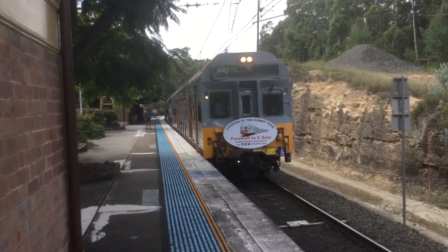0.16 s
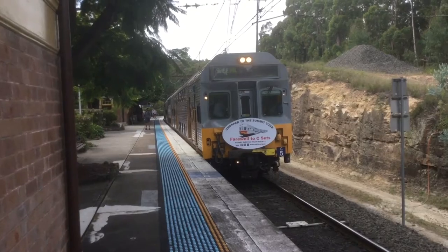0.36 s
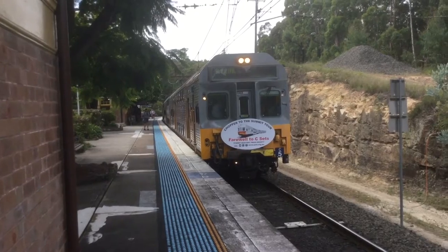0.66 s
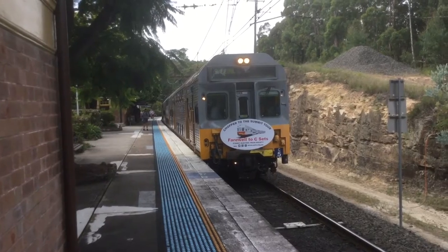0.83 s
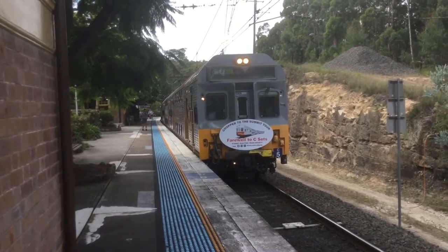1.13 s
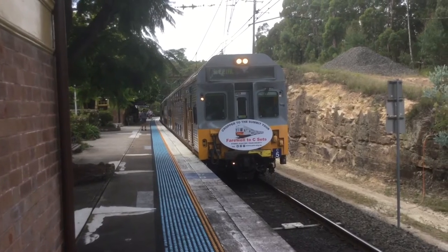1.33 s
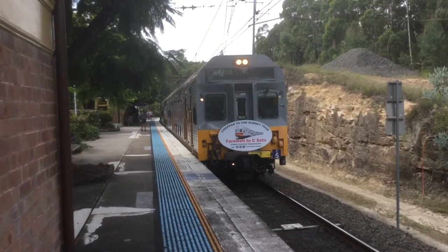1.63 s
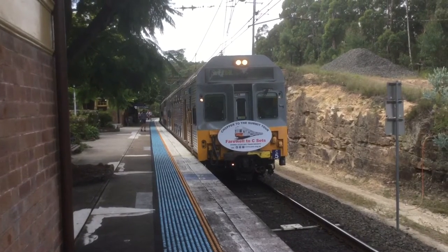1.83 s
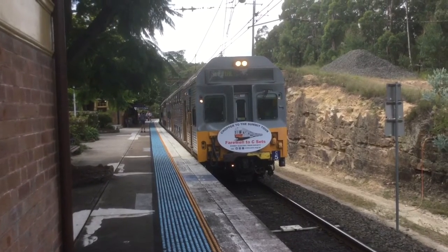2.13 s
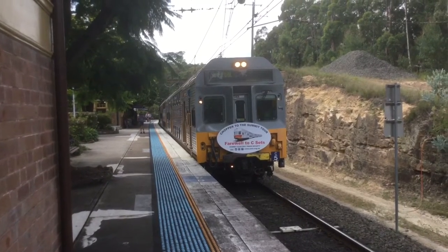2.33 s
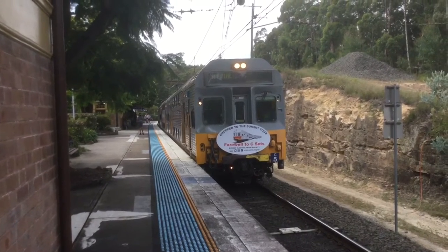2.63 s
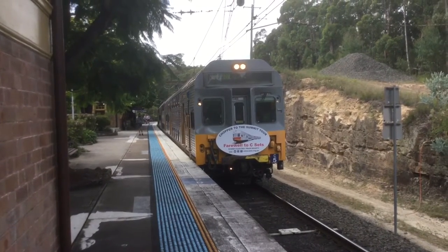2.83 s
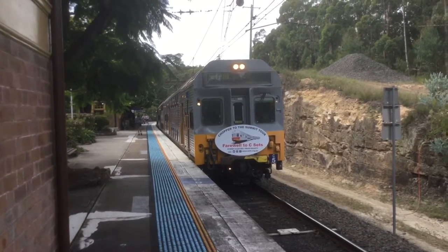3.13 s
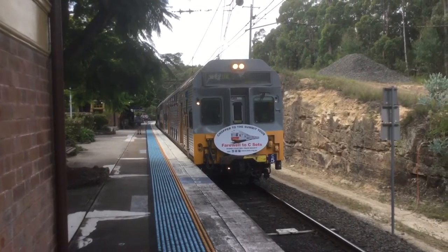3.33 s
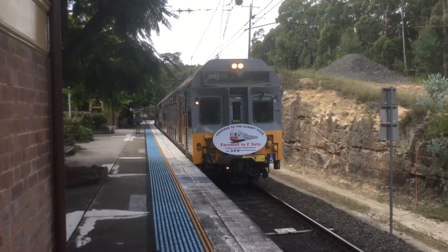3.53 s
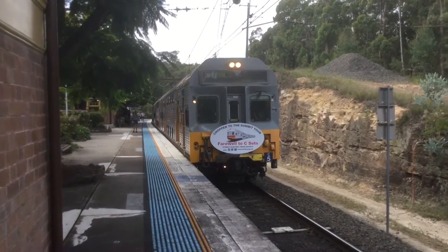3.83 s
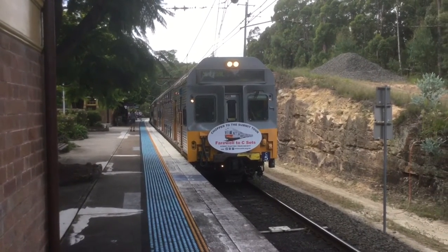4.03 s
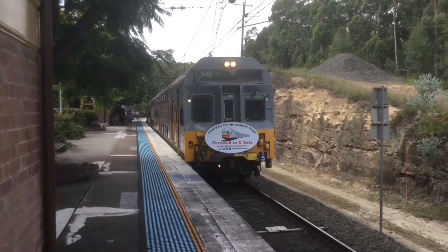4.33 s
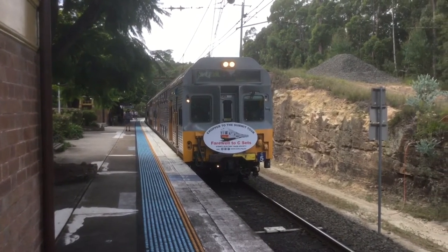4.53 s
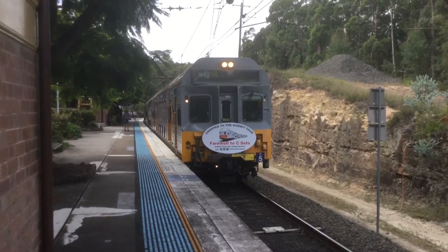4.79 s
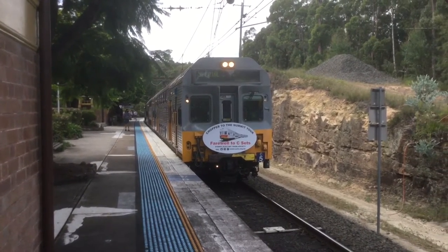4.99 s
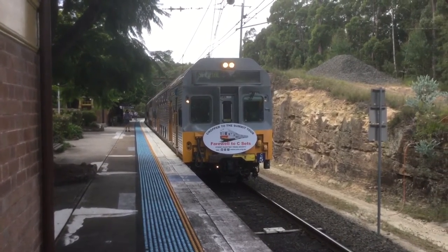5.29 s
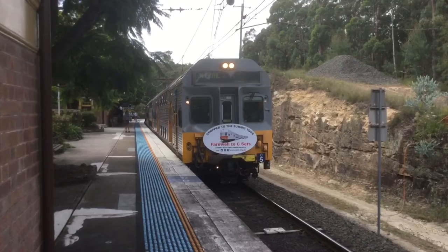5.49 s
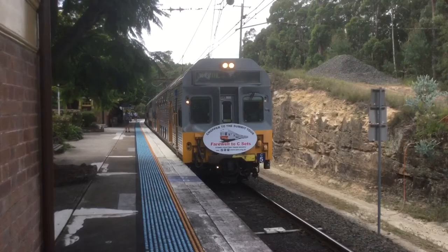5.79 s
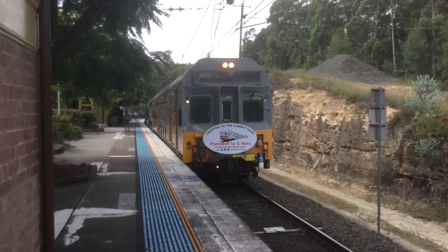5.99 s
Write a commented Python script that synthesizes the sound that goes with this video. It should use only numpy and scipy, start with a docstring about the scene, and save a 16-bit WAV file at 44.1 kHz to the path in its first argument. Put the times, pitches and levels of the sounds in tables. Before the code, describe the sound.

A standing electric train hums and rumbles while a valve releases a long, fading hiss of air and a small bird whistles faintly.

```python
"""An electric train stands at a platform in a rock cutting, its motor-alternator humming over
the rumble of its blowers. A valve opens and air hisses out, fading as the pressure falls.
Dull knocks, light clacks, low thumps, a chink and a few faint squeaks dot the bed.
Behind it a small bird gives six rising whistles, which echo off the rock."""
import sys
import numpy as np
from scipy import signal
from scipy.fft import rfft, irfft, next_fast_len
from scipy.io import wavfile

SR = 44100
rng = np.random.default_rng(int(sys.argv[2]) if len(sys.argv) > 2 else 0)


def dump_mix(stems):
    """Bounce the given channels to the path in sys.argv[1] as a 16-bit WAV at rate SR."""
    frames = np.atleast_2d(stems).T  # one column per channel
    limited = np.clip(frames, -1, 1)  # hard clip at full scale
    pcm = np.round(limited * 32767).astype(np.int16)
    wavfile.write(sys.argv[1], SR, pcm)


N = 271215
TIME = np.arange(N) / SR

# slaps off rock face, wall and train: delay_s, gain_db
SLAP_ECHOES = [(0.017, -15), (0.053, -16), (.078, -17)]
# bird whistles: top_pulse_s, pulse_spacing_s, start_hz, top_hz, level_db, growth_db_per_pulse
BIRD_WHISTLES = [(2.516, 0.044, 3110, 3840, -58.5, 0), (2.75, 0.044, 3240, 3974, -55.5, 2),
                 (3.008, 0.026, 3320, 4170, -54.5, 2.5), (3.251, 0.028, 3420, 4190, -52.5, 4),
                 (3.502, 0.030, 3430, 4280, -50.5, 4), (3.775, 0.025, 3380, 4190, -54.5, 3)]
# brief faint tones: peak_s, level_db, width_s, pitch_hz
FAINT_SQUEAKS = [(2.01, -73, .02, 3480), (2.277, -68, 0.034, 3540), (3.198, -59, .018, 7470),
                 (3.86, -61, 0.0056, 3030), (5.075, -49, 0.06, 492)]
# low thumps: peak_s, level_db, pitch_hz
LOW_THUMPS = [(0.281, -30, 103), (0.584, -31, 95), (0.761, -33, 66), (0.881, -30.5, 87), (2.249, -30.5, 92),
              (3.113, -28.5, 96.5), (3.706, -27.5, 98), (3.888, -30, 91), (4.349, -23.5, 78),
              (4.436, -30, 75.4), (4.69, -31, 105), (5.042, -28.5, 90)]
# dull knocks in the car body: start_s, level_db, decay_s
BODY_KNOCKS = [(0.276, -31.5, 0.014), (1.325, -38.5, 0.041), (3.358, -28.5, 0.044), (3.417, -30.5, 0.014),
               (6.027, -34.5, 0.03)]
# tone colour of the car body: frequency_hz, gain_db
BODY_SPECTRUM = [(50, -18), (100, 7.5), (150, 6), (250, 5.5), (320, -12.5), (700, -22), (1500, -83),
                 (6000, -90)]
# light clacks of loose metal gear: start_s, level_db, decay_s
GEAR_CLACKS = [(0.253, -52.5, .012), (0.266, -51.5, 0.012), (3.335, -47.5, 0.017), (3.355, -50.5, 0.025),
               (5.349, -52.5, 0.012), (5.543, -46, 0.0059), (5.899, -53, .006), (6.013, -53, .016)]
# tone colour of that gear: frequency_hz, gain_db
GEAR_SPECTRUM = [(300, 4), (650, -3), (1000, 5.5), (1400, 6.5), (2300, 1.5), (3000, -6), (4000, -13),
                 (7000, -34), (14000, -58)]
# ring of small metal parts: pitch_hz, level_db
CHINK_MODES = [(5790, -59.5), (6720, -56), (8600, -65), (9150, -60.5), (9950, -59.5), (11040, -66),
               (12200, -63)]
# spurts and ticks of the air system: peak_s, level_db, width_s, centre_hz, width_octaves
AIR_SPITS = [(0.985, -58, 0.016, 5900, 0.05), (1.2425, -45, .0007, 14500, 0.23),
             (1.78, -65.5, 0.19, 6600, 0.25), (3.346, -60.5, 0.016, 6540, 0.42),
             (4.92, -74, 0.17, 6000, .1), (5.1, -77.5, 0.57, 11700, .13), (5.997, -76, .004, 11000, .19),
             (6.044, -69, .010, 7800, .19)]
# surges in the fading jet: peak_s, gain_db, width_s
JET_SURGES = [(3.14, 2, 0.19), (4.72, 1, 0.05), (5.08, 0.5, 0.17)]
# tone colour of the valve's jet: frequency_hz, gain_db
JET_SPECTRUM = [(2500, -16), (4300, -12.5), (4480, -11), (4900, -6.5), (5200, -4), (5900, -3), (6500, -0.5),
                (7200, 0.5), (7550, -3.5), (8400, -4.5), (8900, -7), (9900, -9.5), (10700, -6.5),
                (11500, -6.5), (12800, -11), (13600, -35), (16000, -24)]
# ring of the valve's outlet pipe, relative to the jet: pitch_hz, gain_db, width_hz
PIPE_MODES = [(6040, -14, 53), (6390, -15.5, 55), (6760, -17, 45), (7020, -12.5, 60), (8120, -26, 76),
              (9240, -19.5, 45), (10500, -19.5, 55), (10970, -23, 45), (11200, -21, 60)]
# low rumble of the running machinery: frequency_hz, gain_db
RUMBLE_SPECTRUM = [(20, -57), (31, -42), (40, -18), (50, -3), (75, -3), (98, 1), (125, -4), (180, -3.5),
                   (255, -6), (305, -8), (365, -19.5), (430, -28), (600, -35), (1200, -79)]
# air roaring through the ducts: frequency_hz, gain_db
DUCT_SPECTRUM = [(250, -7), (420, -6), (480, 1), (570, -3.5), (740, -2.5), (860, -21), (1100, -14.5),
                 (2500, -72)]
# rush at the blower outlets: frequency_hz, gain_db
OUTLET_SPECTRUM = [(400, 2), (900, -1.5), (1150, -2.5), (1400, 1), (1850, -1), (2200, -1), (2700, -7),
                   (3250, -14), (4000, -18), (4600, -19), (6300, -19), (8200, -25), (11300, -26),
                   (13500, -37), (16000, -60)]
# fan and equipment tones: pitch_hz, level_db, width_hz
FAN_WHINES = [(95.2, -52, 13), (144.2, -58, 0.65), (342.7, -62, 6.1), (519, -68.5, 7), (1384, -69, 40),
              (2112, -68.5, 57), (2530, -76, 23)]
# hum of the motor-alternator: shaft_multiple, level_db
HUM_HARMONICS = [(3, -64), (4, -54.5), (6, -67), (8, -54.5), (9, -57), (10, -49.5), (12, -71.5), (14, -58),
                 (15, -67), (16, -66), (20, -78), (25, -62.5), (26, -73), (27, -72), (28, -69), (29, -68),
                 (36, -79.5)]


def from_db(db):
    """Decibels to gain."""
    return 10 ** (np.asarray(db) / 20)


def rms_one(x):
    """Scale to unit rms."""
    return x / np.sqrt(np.mean(x ** 2) + 1e-20)


def noise(gain_at):
    """Unit noise whose spectrum follows a function of frequency."""
    size = next_fast_len(N)
    hz = np.maximum(np.fft.rfftfreq(size, 1 / SR), 1)
    return rms_one(irfft(rfft(rng.standard_normal(size)) * gain_at(hz), size)[:N])


def coloured(spectrum):
    """Unit noise shaped by an EQ curve of frequency_hz, gain_db points."""
    points_hz, db = np.transpose(spectrum)
    return noise(lambda hz: from_db(np.interp(np.log(hz), np.log(points_hz), db)))


def narrow(centre_hz, width_hz):
    """Unit noise in one steep-sided resonance."""
    return noise(lambda hz: 1 / (1 + ((hz - centre_hz) / width_hz) ** 2))


def drift(rate_hz):
    """Random wander of spread 1, mostly slower than rate_hz."""
    return narrow(0, rate_hz)


def swell(peak_s, width_s):
    """A bell-shaped envelope of height 1."""
    return np.exp(-0.5 * np.minimum(((TIME - peak_s) / width_s) ** 2, 100))


def struck(start_s, attack_s, decay_s):
    """A quick rise to height 1, then an exponential fall."""
    age = np.maximum(TIME - start_s, 0)
    return np.minimum(age / attack_s, 1) * np.exp(-np.clip((age - attack_s) / decay_s, 0, 20))


def rock_cutting(x, tail_db=-5.5, t60_s=0.72):
    """The direct sound, a few distinct slaps, then a diffuse tail from rock and trees."""
    slaps = sum(from_db(db) * np.interp(TIME - delay_s, TIME, x, left=0) for delay_s, db in SLAP_ECHOES)
    impulse = rng.standard_normal(SR) * np.exp(-np.log(1000) * TIME[:SR] / t60_s)
    tail = signal.fftconvolve(x, impulse / np.linalg.norm(impulse))[:N]
    return x + slaps + from_db(tail_db) * tail


def bird(step_hz=350, arch=0.15, stair=0.56, throb_db=5.5, lead_s=0.11, fade_in_s=0.019, end_pulses=0.6):
    """Each whistle climbs in quick pulses, most growing louder as they rise, and arches over its top."""
    jitter = 1 + 0.00904 * drift(152)
    waver_db = 2 * drift(40)
    out = np.zeros(N)
    for top_s, spacing_s, start_hz, top_hz, db, growth_db in BIRD_WHISTLES:
        pulse = np.clip(TIME - top_s, -lead_s, end_pulses * spacing_s) / spacing_s   # 0 at the top one
        turn = 2 * np.pi * pulse
        stepped = pulse - stair * np.sin(turn) / (2 * np.pi)   # the pitch lingers on each pulse
        below_top = np.hypot(stepped, arch) - arch
        hz = np.maximum(top_hz - step_hz * below_top, start_hz) * jitter
        fade_in = np.clip((TIME - top_s + lead_s) / fade_in_s, 0, 1)
        fade_out = np.clip(10 * (end_pulses - pulse), 0, 1)
        level = from_db(db - growth_db * below_top + throb_db * (np.cos(turn) - 1) + waver_db)
        out += fade_in * fade_out * level * np.sin(2 * np.pi * np.cumsum(hz) / SR)
    return out


def squeaks(jitter=0.0065):
    """Faint, slightly unsteady tones that swell and vanish."""
    clock = np.cumsum(1 + jitter * drift(170)) / SR
    return sum(from_db(db) * swell(peak_s, width_s) * np.sin(2 * np.pi * hz * clock)
               for peak_s, db, width_s, hz in FAINT_SQUEAKS)


def thumps(width_cycles=0.52):
    """Soft low pushes that last only a cycle or two."""
    return sum(from_db(db) * swell(peak_s, width_cycles / hz) * np.cos(2 * np.pi * hz * (TIME - peak_s))
               for peak_s, db, hz in LOW_THUMPS)


def knocks(body_attack_s=0.0035, gear_attack_s=0.0029):
    """Blows shake many close panel modes: dull knocks in the car body, thin clacks in its metal gear."""
    body = sum(from_db(db) * struck(s, body_attack_s, decay_s) for s, db, decay_s in BODY_KNOCKS)
    gear = sum(from_db(db) * struck(s, gear_attack_s, decay_s) for s, db, decay_s in GEAR_CLACKS)
    return body * coloured(BODY_SPECTRUM) + gear * coloured(GEAR_SPECTRUM)


def chink():
    """Small metal parts touch and ring briefly."""
    ring = sum(from_db(db) * narrow(hz, width_hz=190) for hz, db in CHINK_MODES)
    return struck(start_s=2.958, attack_s=0.006, decay_s=0.017) * ring


def spits():
    """Bright spurts of air, each in its own band."""
    out = np.zeros(N)
    for peak_s, db, width_s, centre_hz, octaves in AIR_SPITS:
        spurt = noise(lambda hz: np.exp(-0.5 * (np.log2(hz / centre_hz) / octaves) ** 2))
        out += from_db(db) * swell(peak_s, width_s) * spurt
    return out


def turbulence(x, depth_db=1.5, rate_hz=20, bands=18):
    """Each narrow band of the treble flutters by itself; the result has unit rms."""
    size = next_fast_len(N)
    spectrum = rfft(x, size)
    edges_hz = np.geomspace(3300, 12500, bands - 1)
    band = np.digitize(np.fft.rfftfreq(size, 1 / SR), edges_hz)
    slices = (irfft(spectrum * (band == k), size)[:N] for k in range(bands))
    return rms_one(sum(part * from_db(depth_db * drift(rate_hz)) for part in slices))


def air_flow(age, level_db=-54, attack_s=0.016, burst_s=0.094, drain_s=2.01, close_s=5.27):
    """The jet's envelope: a sharp opening burst, sinking pressure with a few surges, a gradual close."""
    burst_db = 4 * np.exp(-age / burst_s)
    loss_db = 17 * (1 - np.exp(-age / drain_s))
    surge_db = sum(db * swell(peak_s, width_s) for peak_s, db, width_s in JET_SURGES)
    closing_db = 32 * np.maximum(TIME - close_s, 0)
    return np.minimum(age / attack_s, 1) * from_db(level_db + burst_db - loss_db + surge_db - closing_db)


def air_valve(open_s=0.9575, whistle_decay_s=0.07, sizzle_decay_s=0.12):
    """A jet that whistles and sizzles as it opens, rings in its pipe and fades with the pressure."""
    age = np.maximum(TIME - open_s, 0)
    pipe = sum(from_db(db) * narrow(hz, width_hz) for hz, db, width_hz in PIPE_MODES)
    jet = turbulence(coloured(JET_SPECTRUM) + pipe)
    whistle = from_db(-11) * np.exp(-age / whistle_decay_s) * narrow(centre_hz=4500, width_hz=60)
    top_band = noise(lambda hz: 1 / (1 + ((hz - 10800) / 2200) ** 4))
    sizzle = from_db(-1.5) * np.exp(-age / sizzle_decay_s) * top_band
    flutter = from_db(0.4 * drift(24))
    return air_flow(age) * flutter * (jet + whistle + sizzle)


def blowers(rumble_db=-41, duct_db=-54, outlet_db=-55, lift_from_s=5.4):
    """The bed of moving air: lumpy rumble, duct roar and outlet rush, with fan whines on top."""
    lift_db = 4 * np.maximum(TIME - lift_from_s, 0)   # rumble and rush build towards the end
    dip_db = 3 * swell(peak_s=2.74, width_s=0.08)   # the rumble eases once
    rumble = from_db(rumble_db + lift_db - dip_db + 1.5 * drift(21)) * coloured(RUMBLE_SPECTRUM)
    ducts = from_db(duct_db + 1.4 * drift(15)) * coloured(DUCT_SPECTRUM)
    outlets = from_db(outlet_db + 0.77 * lift_db + 1.12 * drift(23)) * coloured(OUTLET_SPECTRUM)
    whines = sum(from_db(db) * narrow(hz, width_hz) for hz, db, width_hz in FAN_WHINES)
    thin_whine = from_db(-79) * narrow(centre_hz=3020, width_hz=10)
    return rumble + ducts + outlets + whines + thin_whine


def alternator(shaft_hz=24.784, speed_wander=0.00069, waver_db=2.5, scatter_rad=0.47):
    """The train's hum: multiples of one shaft rate, each wavering in level and phase as it scatters."""
    turns = np.cumsum(shaft_hz * (1 + speed_wander * drift(0.8))) / SR
    out = np.zeros(N)
    for multiple, db in HUM_HARMONICS:
        phase = 2 * np.pi * (multiple * turns + rng.random()) + scatter_rad * drift(3.1)
        out += from_db(db + waver_db * drift(4.3)) * np.sqrt(2) * np.sin(phase)
    return out


def scene():
    """The mono mix from the platform: the train dry, the bird echoing in the cutting."""
    train = alternator() + blowers() + air_valve() + spits() + chink() + knocks() + thumps()
    return (train + squeaks() + rock_cutting(bird()))[None]


def record(dry):
    """A steep low-pass trims the very top."""
    cutoff_hz = 15720
    return signal.sosfilt(signal.ellip(10, 0.1, 80, cutoff_hz, fs=SR, output="sos"), dry)


dry = scene()
out = record(dry)
dump_mix(out)
```